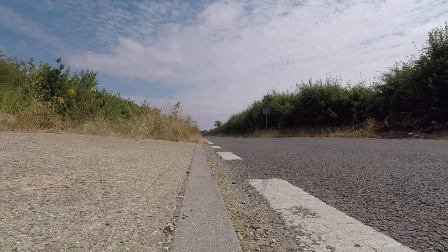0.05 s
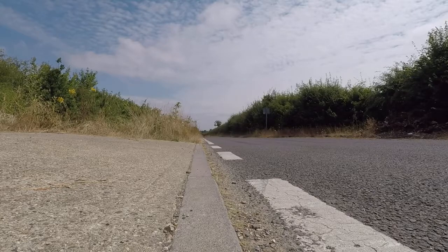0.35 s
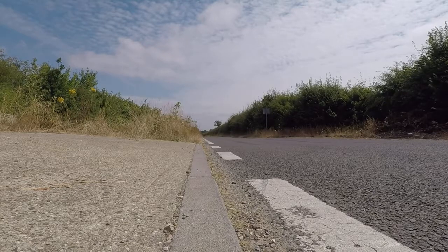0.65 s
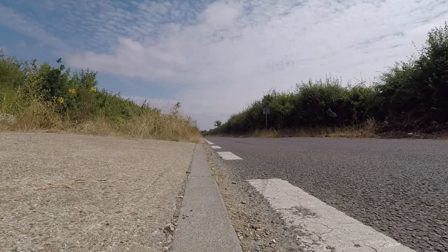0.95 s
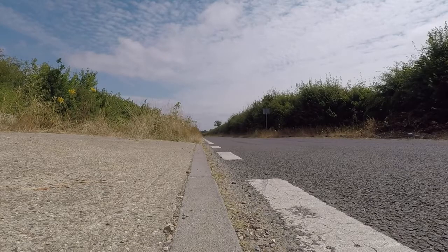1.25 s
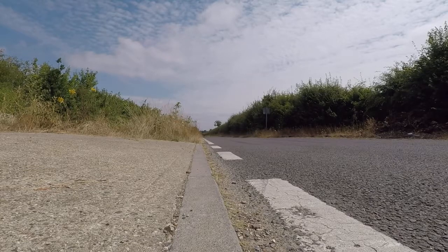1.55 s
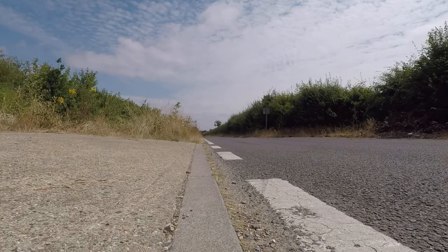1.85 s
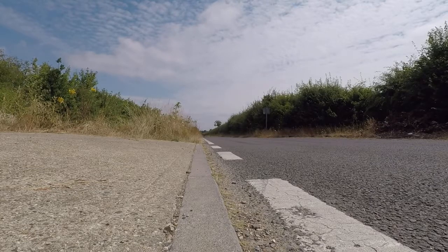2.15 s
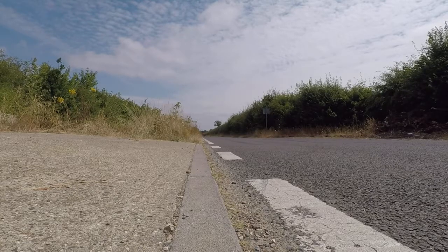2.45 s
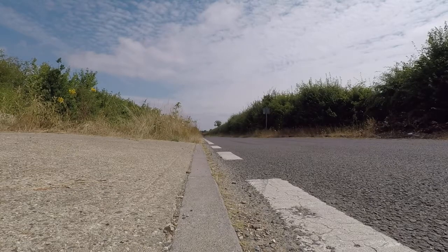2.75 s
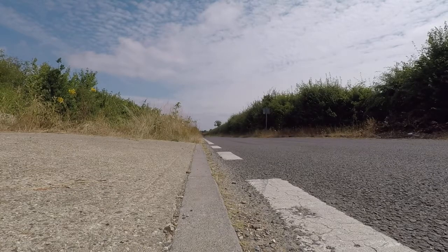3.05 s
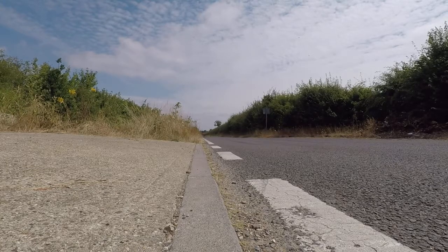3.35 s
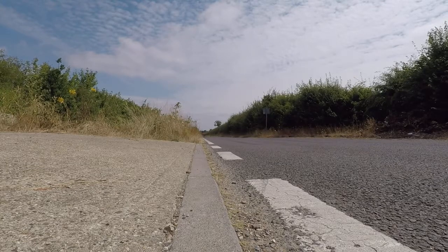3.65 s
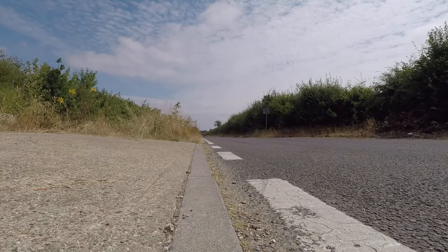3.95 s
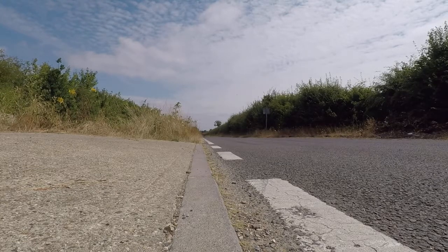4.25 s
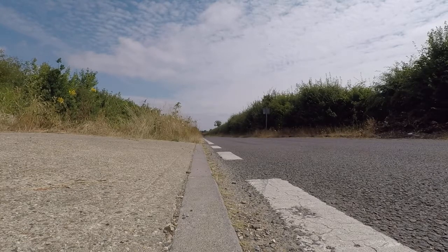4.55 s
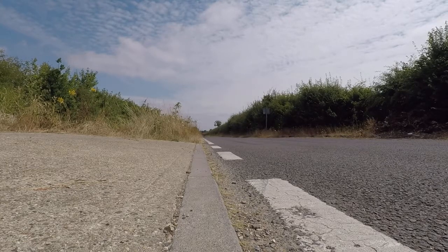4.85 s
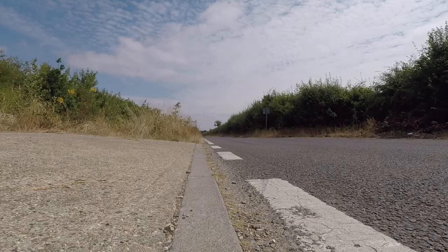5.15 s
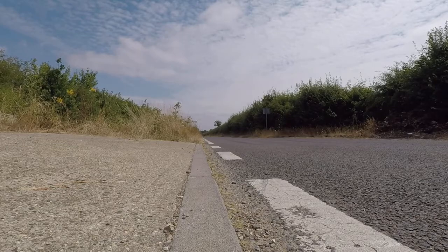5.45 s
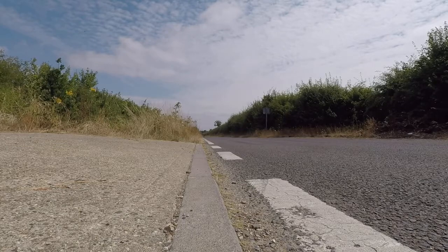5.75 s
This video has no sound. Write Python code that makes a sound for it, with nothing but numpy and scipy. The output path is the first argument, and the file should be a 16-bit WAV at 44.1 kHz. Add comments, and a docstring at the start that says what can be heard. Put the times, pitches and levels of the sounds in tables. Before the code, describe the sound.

On a quiet country road, a light breeze rumbles on the microphone over the blurred boom of a far-off car. The breeze dies away as the car approaches at a steady speed. Its exhaust becomes a clear low drone, then a deep throb, while tyre roar on asphalt swells on the right. Near the end the wind returns as heavy, low buffeting, before the car has passed.

```python
"""A breeze rumbles on the microphone over the smeared boom of a far-off car on a quiet country road.
The car comes closer at a steady speed and the breeze dies away. The pulses of the exhaust become a
clear drone, then a deep throb, while the roar of tyres on asphalt swells on the right.
At the end the wind comes back, and its swirls build into heavy, low buffeting."""
import sys
import numpy as np
from scipy import signal
from scipy.fft import rfft, irfft, next_fast_len
from scipy.io import wavfile
from scipy.ndimage import uniform_filter1d, minimum_filter1d, map_coordinates

SR = 44100
rng = np.random.default_rng(int(sys.argv[2]) if len(sys.argv) > 2 else 0)


def transcribe(signal):
    """Save signal, clipped to [-1, 1], as a 16-bit WAV file at the path in sys.argv[1]."""
    frames = np.atleast_2d(signal).T
    limited = np.clip(frames, -1, 1)
    pcm = np.round(limited * 32767).astype(np.int16)
    wavfile.write(sys.argv[1], SR, pcm)


N = 260190

# The colour of each noise, or how its low and high parts compare: pitch_hz, level_db
AIR_COLOUR = [(20, 7), (60, 1), (110, -17), (250, 4), (420, -0.5), (650, 2), (1000, -4.5), (2000, -14),
              (3000, -22), (4500, -31.5), (9000, -56)]
HISS_COLOUR = [(1000, -12), (3000, -3.5), (4100, -4.5), (4800, -1), (6300, 0), (7500, 2.5), (8200, -1),
               (10000, -1), (11300, -7), (12500, -6.5), (15000, -17)]
BREEZE_COLOUR = [(12, -5), (22, -2.5), (40, -4.5), (58, 0), (80, -0.5), (105, -5.5), (135, -1), (190, -13),
                 (300, -48), (700, -81)]
GUST_COLOUR = [(120, -32), (220, -5), (290, 6.5), (370, -5), (480, -28), (1000, -50)]
BUFFET_COLOUR = [(12, 6), (26, 3), (44, 5.5), (62, 3.5), (90, -4.5), (125, -7.5), (165, -20), (220, -26.5),
                 (400, -33), (900, -84), (2000, -120)]
CHURN_COLOUR = [(60, -3), (118, 7), (160, 0), (230, -22), (330, -42), (430, -12), (800, -51), (2000, -120)]
TYRES_FAR = [(100, -44), (250, 13), (350, 8), (450, 5), (600, 1.5), (740, -2.5), (860, 5), (1020, -0.5),
             (1300, -2), (1600, -7.5), (2300, -13), (3300, -22.5), (6000, -32), (14000, -55)]
TYRES_MIDDLE = [(100, -6), (300, 7), (430, 4), (620, 1), (720, -2.5), (830, -0.5), (1060, -3), (1180, -7),
                (1400, -7), (1550, -9), (1850, -8.5), (2100, -18), (2330, -15), (3700, -29), (14000, -42)]
TYRES_CLOSE = [(100, -18), (250, 8), (400, 5), (540, 1), (680, 1), (760, 4), (860, 3.5), (1070, 1),
               (1240, -4.5), (1750, -8), (2600, -17.5), (3700, -31), (6000, -30), (14000, -56)]
BOOM_COLOUR = [(90, -42), (118, -20.5), (142, -3.5), (177, 2), (205, -4), (235, -5.5), (265, -20.5),
               (295, -14), (325, -23.5), (360, -23), (410, -29), (700, -59)]
# How a sound reaches left and right: pitch_hz, left_minus_right_db, left_lead_rad, likeness (0 to 1)
FROM_ROAD = [(60, 2, 0.5, 1), (168, -4, 0, 0.99), (323, -6.5, -0.03, 0.86), (585, -7.5, 2, 1),
             (747, -8, 3.5, 0.89), (1120, -17.5, 1.15, 0.87), (1500, -12.5, -0.8, 0.73),
             (2020, -9, 1, 0.79), (2700, -13.5, 0, 0.99), (6000, 1, 1, 0.43)]
FROM_ALL_ROUND = [(60, -1.8, -0.37, 0.99), (177, -3, 0.35, 1), (303, -2, 1.07, 0.3), (538, -3.5, 3, 0.61),
                  (727, -1, 3, 0.91), (1390, 1, 3.5, 0.7), (2680, -0.5, 2.5, 0.16)]
HISS_SPREAD = [(2500, 5, 0, 0.1), (4130, 0.5, 0, 0.85), (5470, -0.5, 0, 0.07), (7850, -4.5, 0, 0.082),
               (12000, -1, 0, 0.076)]
# Brief rises and dips in the breeze, the buffeting and the boom: centre_s, half_width_s, gain_db
BREEZE_SWELLS = [(0.55, 0.13, 0.5), (1.5, 0.15, 0), (1.82, 0.059, -2)]
BUFFET_SWELLS = [(5.04, 0.065, 3), (5.58, 0.043, 2), (5.72, 0.031, 8), (5.88, 0.05, 6)]
BOOM_SWELLS = [(.45, 0.72, 4), (2.17, 0.25, 6), (5.15, 0.32, 5.5)]
# Which colour is heard from how far away: distance_m, stage (0 far, 1 middle, 2 close)
TYRE_STAGES = [(55.1, 0.021), (39, 0.82), (22.4, 2)]
EXHAUST_STAGES = [(44.6, 0.038), (41.2, 1), (31.2, 1), (26.7, 2)]
# Moments when the tyres sing: centre_s, half_width_s, pitch_hz, glide_hz_per_s, level_db
TYRE_WHINES = [(2.5, 0.22, 1148, 2.5, -58.5), (3.05, 0.17, 1120, 3, -58), (4.049, 0.5, 1365, 220, -58.5),
               (4.75, 0.35, 1030, -190, -52), (4.85, 0.32, 1714, -21.5, -60),
               (5.33, 0.14, 890, -140, -50.5), (5.48, 0.11, 1840, -200, -57), (5.75, 0.17, 1060, 6, -43.5)]
# How often the engine fires: time_s, rate_hz
FIRING_RATE = [(0, 59.5), (3.4, 60), (3.75, 59.9), (4.25, 59.5), (4.55, 60.05), (5, 60.6), (5.3, 61),
               (5.9, 60.9)]
# The mix of tones in the exhaust: multiple (of the firing rate), far_db, middle_db, close_db
EXHAUST_TONES = [(1, -17, -13, -18), (2, -31, -7.5, -4), (2.5, -12, -8.5, -20), (3, -10.5, 3.5, -30),
                 (3.5, -17, -11, -21), (4, -9.5, -2, -21), (4.5, -16, -18, -19), (5, -13, -22, -15.5),
                 (6, -11, -9.5, -21), (8, -17, -5.5, -39), (9, -10, -11, -35), (10, -21, -12, -21),
                 (11, -38, -33, -20)]

TIME_S = np.arange(N) / SR


def amp(db):
    """Turns decibels into a number to multiply by."""
    return 10 ** (np.asarray(db) / 20)


def unit(x):
    """Scales a sound to an average power of 1."""
    return x / np.sqrt(np.mean(x ** 2) + 1e-20)


def at_pitch(rows, hz):
    """Reads each column after the first at these pitches, sliding between rows."""
    pitches, *columns = np.transpose(rows)
    return [np.interp(np.log(hz + 1), np.log(pitches + 1), column) for column in columns]


def ramp(start_s, length_s):
    """Rises evenly from 0 to 1."""
    return np.clip((TIME_S - start_s) / length_s, 0, 1)


def swells(rows):
    """Bell-shaped rises and dips of level, in dB."""
    return sum(db * np.exp(-((TIME_S - centre_s) / width_s) ** 2) for centre_s, width_s, db in rows)


def wobble(per_s):
    """A smooth curve through per_s random points a second."""
    points = rng.standard_normal(int(N * per_s / SR) + 4)
    return map_coordinates(points, [TIME_S * per_s])


def filtered(x, gain_at):
    """Multiplies each pitch in a sound by gain_at(hz)."""
    size = next_fast_len(N + SR // 2)
    hz = np.fft.rfftfreq(size, 1 / SR)
    return irfft(rfft(x, size) * gain_at(hz), size)[..., :N]


def stereo_gains(spread, hz):
    """How strongly and how early a pitch reaches left and right, as two complex numbers."""
    balance_db, lead_rad, _ = at_pitch(spread, hz)
    left = amp(balance_db / 2) * np.exp(.5j * lead_rad)
    pair = np.array([left, 1 / left])
    return pair / np.sqrt(np.mean(abs(pair) ** 2, axis=0))


def rush(colour, spread, patchy_db):
    """Rushing stereo noise of power 1, with drifting louder and softer patches."""
    def shares(hz):
        likeness = np.clip(at_pitch(spread, hz)[2], 0, 1)
        angle = np.arccos(likeness) / 2
        return np.array([np.cos(angle), np.sin(angle)])

    spectrum = signal.stft(rng.standard_normal((2, N)), nperseg=1024)[2]
    patches = uniform_filter1d(rng.standard_normal(spectrum.shape[1:]), size=4, axis=0)  # across pitch
    patches = uniform_filter1d(patches, size=14, axis=1)  # across time
    noise = signal.istft(spectrum * amp(patchy_db * unit(patches)), nperseg=1024)[1][:, :N]
    shared, apart = filtered(noise, shares)
    pair = np.array([shared + apart, shared - apart])
    return unit(filtered(pair, lambda hz: amp(at_pitch(colour, hz)[0]) * stereo_gains(spread, hz)))


def evened(x, span_s):
    """Steadies a noise by taking out swells slower than span_s."""
    power = uniform_filter1d(np.mean(x ** 2, axis=0), size=int(span_s * SR))
    return x / np.sqrt(abs(power) + 1e-9)


def background():
    """The soft rush of open country and the microphone's own hiss."""
    air = amp(-46.5) * rush(AIR_COLOUR, FROM_ALL_ROUND, patchy_db=1.5)
    hiss = amp(-60) * rush(HISS_COLOUR, HISS_SPREAD, patchy_db=1.0)
    return air + hiss


def breeze():
    """Air swirls round the camera: a light rumble with one brighter gust, slowing to a lull."""
    speed = 1 - ramp(start_s=1.41, length_s=3.06)
    pressure = speed ** 2.2
    rumble = evened(rush(BREEZE_COLOUR, FROM_ALL_ROUND, patchy_db=2.5), span_s=0.29)
    rumble_db = -33 + swells(BREEZE_SWELLS) + 0.83 * wobble(per_s=13.74)
    gust_shape = ramp(start_s=1.07, length_s=0.11) - ramp(start_s=1.38, length_s=0.7)
    gust = amp(-47) * gust_shape * rush(GUST_COLOUR, FROM_ALL_ROUND, patchy_db=1.5)
    return amp(rumble_db) * pressure * rumble + gust


def buffeting():
    """The wind returns in deep, growing swirls; at its fastest, smaller swirls churn higher up."""
    start_s, growth_db_per_s = 4.09, 23
    rumble_db = -56 + growth_db_per_s * (TIME_S - start_s) + swells(BUFFET_SWELLS)
    rumble = evened(rush(BUFFET_COLOUR, FROM_ALL_ROUND, patchy_db=2.0), span_s=0.059)
    churn = evened(rush(CHURN_COLOUR, FROM_ALL_ROUND, patchy_db=5.5), span_s=0.026)
    return (ramp(start_s, length_s=0.61) * amp(rumble_db) * rumble
            + ramp(start_s=5.74, length_s=0.045) * amp(-24.5) * churn)


def approach():
    """How far away the car is, and how much its level changes on the way to the listener."""
    speed_m_per_s, side_m, alongside_s = 20.64, 1.7, 6.594  # the sound ends before the car is alongside
    reference_m, ground_loss_db_per_m = 20, 0.0855
    distance_m = np.hypot(side_m, speed_m_per_s * (alongside_s - TIME_S))
    spreading_db = -20 * np.log10(distance_m / reference_m)
    ground_db = -ground_loss_db_per_m * (distance_m - reference_m)  # soaked up by road and verge
    dip_db = swells([(5.29, 0.58, -4)])  # the level dips briefly
    return distance_m, spreading_db + ground_db + dip_db


def stage_at(distance_m, stages):
    """Which colour is heard from this distance: 0 far, 1 middle, 2 close, or a blend."""
    metres, stage = np.transpose(stages)
    return np.interp(-distance_m, -metres, stage)


def tyre_whine():
    """Narrow bands of tread noise rise, glide as the echo off the road shifts, and sink back."""
    edge_hz, edge_db = 170, -31  # this far from its centre, a band is this much weaker
    out = np.zeros((2, N))
    for centre_s, width_s, hz, glide_hz_per_s, level_db in TYRE_WHINES:
        band = [(hz / 2, -90), (hz - edge_hz, edge_db), (hz, 0), (hz + edge_hz, edge_db), (hz * 2, -90)]
        ring = filtered(rng.standard_normal(N), lambda f: amp(at_pitch(band, f)[0]))
        offset_s = TIME_S - centre_s
        glide = np.exp(1j * np.pi * glide_hz_per_s * offset_s ** 2)
        sliding = signal.hilbert(ring, next_fast_len(N))[:N] * glide
        pair = np.real(stereo_gains(FROM_ROAD, hz)[:, None] * sliding)
        fade = np.exp(-.5 * (offset_s / width_s) ** 2)
        out += amp(level_db) * fade * evened(pair, span_s=0.18)
    return out


def tyre_roar(distance_m, path_db):
    """Tread roars on coarse asphalt; its colour shifts with distance as the echo off the road changes."""
    nearness = stage_at(distance_m, TYRE_STAGES)
    colours = [(TYRES_FAR, 4.8), (TYRES_MIDDLE, 6), (TYRES_CLOSE, 5.6)]
    roar = np.zeros((2, N))
    for stage, (colour, gain_db) in enumerate(colours):
        share = np.clip(1 - abs(nearness - stage), 0, 1)
        roar += np.sqrt(share) * amp(gain_db) * rush(colour, FROM_ROAD, patchy_db=1.5)
    return amp(-37 + path_db + 0.31 * wobble(per_s=15)) * roar


def exhaust_boom(firing_phase, path_db):
    """Gas rushes and rings in the silencer, puffing once a firing, smeared by the hedges."""
    gas = evened(rush(BOOM_COLOUR, FROM_ROAD, patchy_db=1.5), span_s=0.1)
    puffs = 1 + 0.1 * np.cos(firing_phase)
    carried = amp(-41.5 + swells(BOOM_SWELLS))  # travels along the hedges from any distance
    direct = amp(-37.5 + path_db)
    return np.hypot(carried, direct) * unit(gas * puffs)


def exhaust_drone(firing_phase, distance_m, path_db):
    """The tailpipe hums at multiples of the firing rate; unequal cylinders add tones halfway between."""
    hedge_db, clear_m, clearing_m = -11, 67, 11  # hedges block some of the drone until the car is nearer
    hidden = np.clip((distance_m - clear_m) / clearing_m + .5, 0, 1)
    nearness = stage_at(distance_m, EXHAUST_STAGES)
    firing_hz = np.mean(FIRING_RATE, axis=0)[1]
    out = np.zeros((2, N))
    for multiple, *stages_db in EXHAUST_TONES:
        tone_db = np.interp(nearness, [0, 1, 2], stages_db)
        waver_db = 1.4 * wobble(per_s=5)  # moving air makes each tone waver
        # Echoes from road and hedge scramble the shape of the pulses.
        scatter_rad = 2 * np.pi * rng.random() + 0.29 * wobble(per_s=10)
        flutter = 1 + .15 * (wobble(per_s=45) + 1j * wobble(per_s=45))  # no two firings are alike
        tone = amp(tone_db + waver_db) * flutter * np.exp(1j * (multiple * firing_phase + scatter_rad))
        out += np.real(stereo_gains(FROM_ROAD, multiple * firing_hz)[:, None] * tone)
    return amp(-28.5 + path_db + hedge_db * hidden) * out


def scene():
    """The car, the wind and the quiet countryside together."""
    firing_hz = np.interp(TIME_S, *np.transpose(FIRING_RATE))
    firing_phase = 2 * np.pi * np.cumsum(firing_hz) / SR  # one turn for each firing
    distance_m, path_db = approach()
    exhaust = exhaust_drone(firing_phase, distance_m, path_db) + exhaust_boom(firing_phase, path_db)
    tyres = tyre_roar(distance_m, path_db) + tyre_whine()
    return exhaust + tyres + breeze() + buffeting() + background()


def record(dry):
    """The camera switches on after a moment, trims the lowest and highest sounds and holds peaks down."""
    low_cut_hz, top_hz = 18, 15000
    ceiling, hold_samples = .65, int(.03 * SR)
    bass_cut = signal.butter(4, low_cut_hz, "highpass", fs=SR, output="sos")
    sound = signal.sosfilt(bass_cut, dry) * ramp(start_s=.072, length_s=.002)
    needed_gain = ceiling / np.maximum(abs(sound).max(axis=0), ceiling)
    smooth_gain = uniform_filter1d(minimum_filter1d(needed_gain, hold_samples), hold_samples)
    return filtered(sound * smooth_gain, lambda hz: hz < top_hz)


dry = scene()
out = record(dry)
transcribe(out)
```